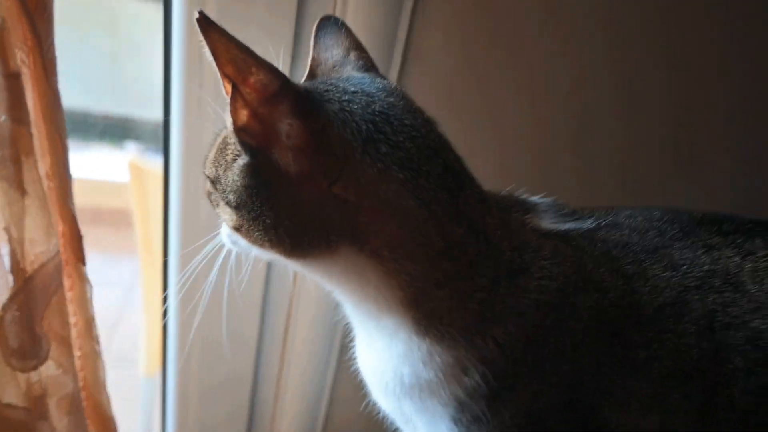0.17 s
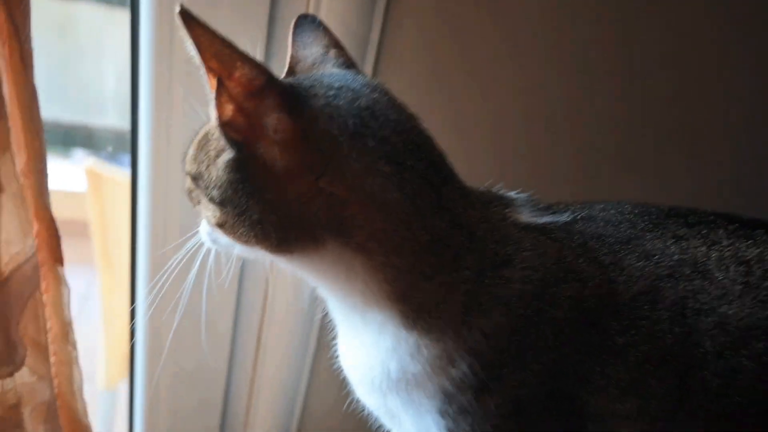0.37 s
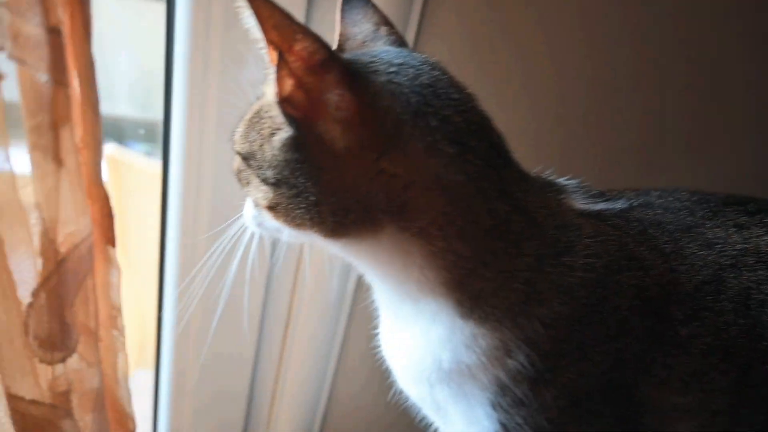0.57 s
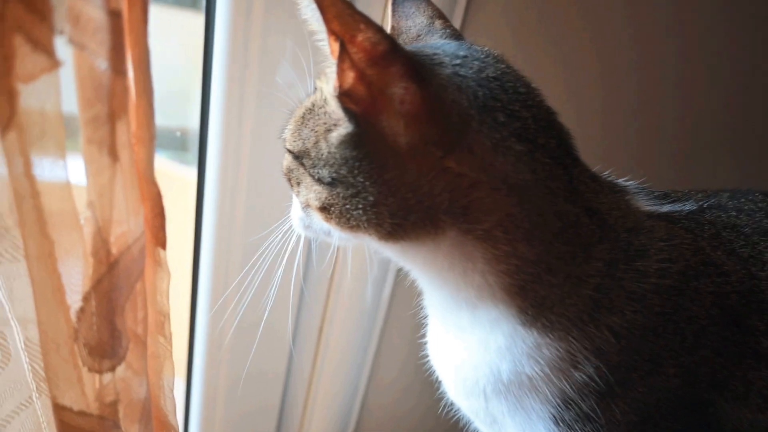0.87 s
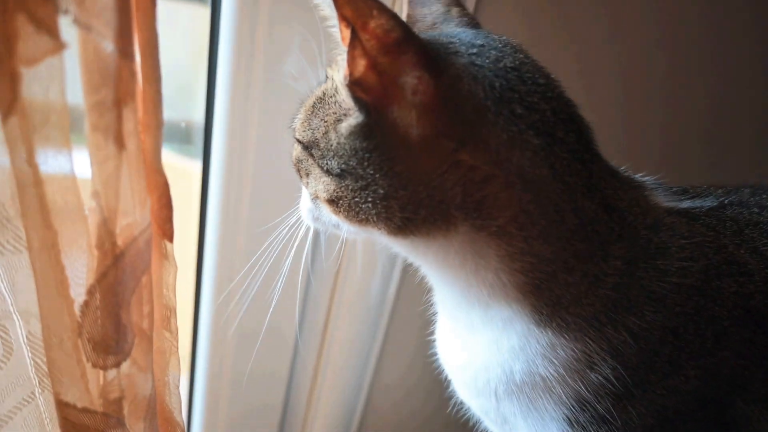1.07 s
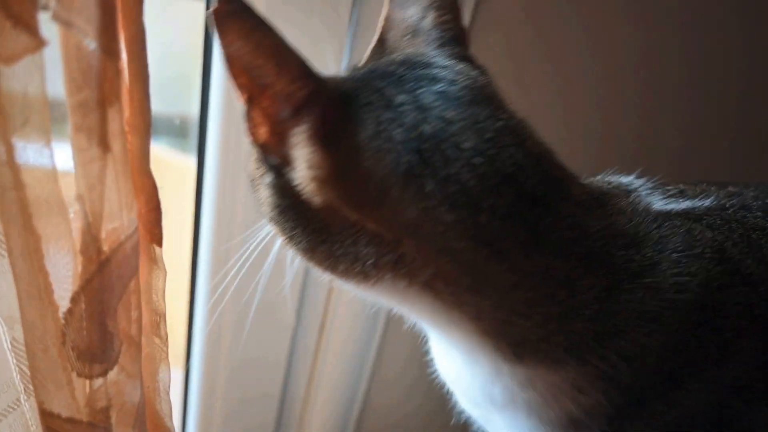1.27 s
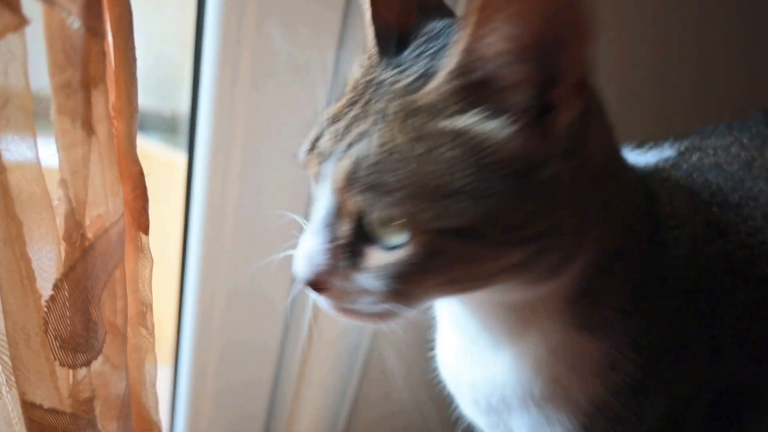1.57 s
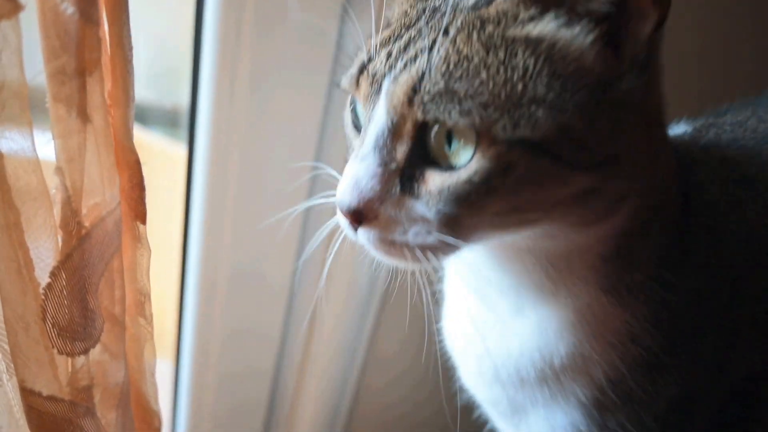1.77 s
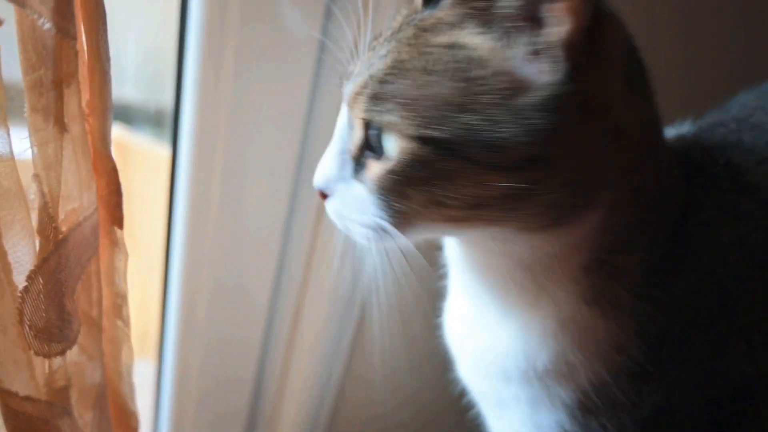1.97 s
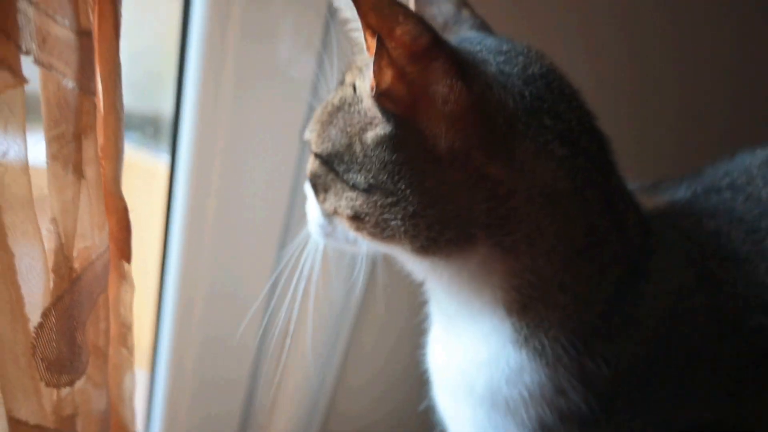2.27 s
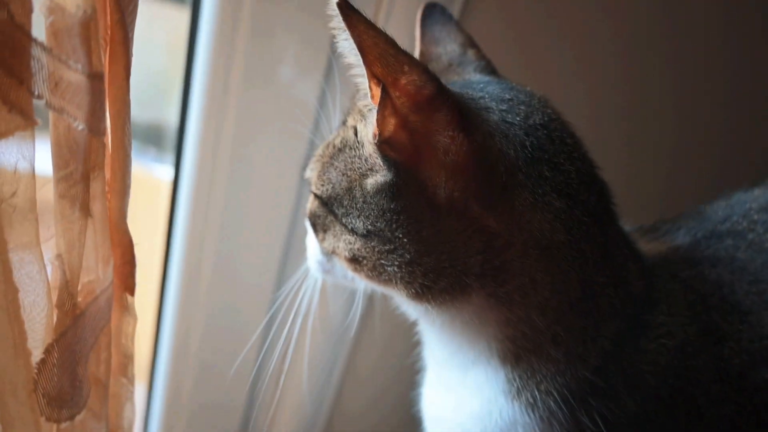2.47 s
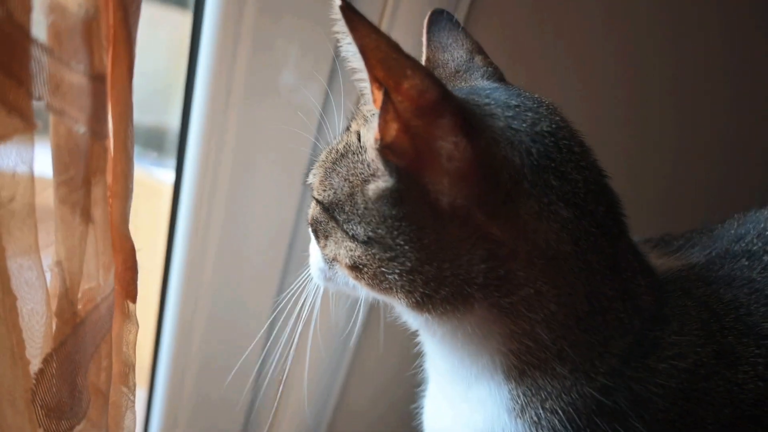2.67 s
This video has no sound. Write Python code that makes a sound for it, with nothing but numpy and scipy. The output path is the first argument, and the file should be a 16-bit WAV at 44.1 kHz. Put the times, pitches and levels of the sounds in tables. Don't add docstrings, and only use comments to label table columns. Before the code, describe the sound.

A cat gives one short, low, fluttering closed-mouth trill close by in a quiet humming room

```python
import sys
import numpy as np
from scipy import signal
from scipy.io import wavfile
from scipy.ndimage import uniform_filter1d

SR = 44100
rng = np.random.default_rng(int(sys.argv[2]) if len(sys.argv) > 2 else 0)


def gain_from_db(level_db):
    decades = np.asarray(level_db, float) / 20
    return 10 ** decades


def int16_out(signal):
    q = np.round(np.clip(np.atleast_2d(signal).T, -1, 1) * 32767)
    wavfile.write(sys.argv[1], SR, q.astype(np.int16))


N = 123921


def evened(x):
    return x / np.sqrt(np.mean(x ** 2) + 1e-20)


def read(points, hz):
    f, value = np.transpose(points)
    return np.interp(np.log(hz + 1), np.log(f + 1), value)


def bumps(centres, lengths, dbs):
    t = np.arange(N) / SR
    total = 0
    for centre, length, db in zip(centres, lengths, dbs):
        total = total + gain_from_db(db) * np.cos(np.pi * np.clip((t - centre) / length, -.5, .5))
    return total


def resonate(x, hz, width):
    turn = np.exp(2j * np.pi * hz * np.arange(len(x)) / SR)
    r = np.exp(-np.pi * width / SR)
    return 2 * (turn * signal.lfilter([1 - r], [1, -r], x / turn)).real


def resonate_twice(x, hz, width):
    return evened(resonate(resonate(x, hz, width), hz, width))


def noise(spectrum, patchy_db):
    frames, hz = N // 256 + 5, np.fft.rfftfreq(1024, 1 / SR)
    a, b, patches = rng.standard_normal((frames, 513, 3)).T
    patches = uniform_filter1d(patches, size=12, axis=0)
    patches = evened(uniform_filter1d(patches, size=14, axis=1))
    z = (a + 1j * b) * gain_from_db(read(spectrum, hz)[:, None] + patchy_db * patches)
    return evened(signal.istft(z, nperseg=1024, noverlap=768)[1][:N])


# pitch in Hz, level in dB per Hz.
AIR = [(53, -61), (90, -22), (140, -5), (177, -4), (223, -6.5), (540, -19.5), (618, -20.5), (668, -18),
       (9000, -39), (11700, -46), (19800, -120)]
# pitch in Hz, width in Hz, level in dB.
HUMS = [(226.6, 29, -61.5), (326.1, 17.5, -67.5), (72, 24, -63.5), (275, 39.5, -66.5)]


def room_tone():
    hums = sum(gain_from_db(db) * resonate_twice(rng.standard_normal(N), hz, width) for hz, width, db in HUMS)
    colour = [(30, 7.83)] + AIR + [(16000, AIR[-1][1] - 6)]
    return gain_from_db(-53) * noise(colour, patchy_db=1.21) + hums


# time in seconds, pitch in Hz, level in dB.
MOTOR = [(0, 136.2, -60.5), (.15, 137.7, -56.5), (.42, 138.1, -55), (.55, 137.8, -59.5), (.8, 140, -57),
         (.95, 139.5, -67.5), (1.2, 139.3, -59), (1.32, 137.4, -55), (1.6, 137.8, -53.5), (1.72, 138, -57),
         (1.93, 136.9, -51), (2.1, 137.5, -59), (2.27, 136.4, -63.5), (2.4, 138, -56), (2.8, 137, -53.5)]
# centre in seconds, length in seconds, pitch in Hz, level in dB.
DRONES = [(0.292, 0.2, 229, -56.5), (.5, 0.13, 207.5, -59), (.87, 0.23, 219, -53),
          (1.247, 0.07, 210.7, -53.5), (1.811, 0.13, 228.1, -52.5), (2.084, 0.19, 226, -56.5),
          (2.42, 0.26, 232, -60), (2.709, 0.079, 227.5, -55.5)]


def motor():
    t = np.arange(N) / SR
    s, hz, db = np.transpose(MOTOR)
    tone = gain_from_db(np.interp(t, s, db)) * np.sin(2 * np.pi * np.cumsum(np.interp(t, s, hz)) / SR)
    for centre, length, drone_hz, drone_db in DRONES:
        tone = tone + bumps([centre], [length], [drone_db]) * np.sin(2 * np.pi * drone_hz * t)
    return np.sqrt(2) * tone


# pitch in Hz, level in dB per Hz.
HISS = [(15, -33), (25, -28), (101, -11), (246, -8), (379, -4.5), (411, -4), (3270, -9), (15600, -7.5)]


def microphone_hiss():
    return gain_from_db(-60) * np.array([noise(HISS, patchy_db=1.0), noise(HISS, patchy_db=4.0)])


# start in seconds, length in seconds, level in dB.
RUBS = [(-.04, 0.17, -60.5), (0.074, 0.44, -61), (0.103, 0.051, -59), (0.24, 0.041, -72),
        (1.288, 0.085, -61), (1.409, 0.075, -60), (2.055, 0.12, -63.5), (2.7, 0.11, -69)]
# pitch in Hz, level in dB.
RUB = [(200, -1), (500, 5.5), (1500, 0.5), (3000, -9.5), (7000, -7.5), (12000, -17.5)]
# centre in seconds, length in seconds, level in dB.
SCUFFS = [(0.254, 0.043, -59), (0.268, 0.014, -63), (0.3, .012, -62), (.35, 0.047, -66),
          (1.775, 0.023, -66)]
# pitch in Hz, level in dB.
SCUFF = [(2500, -5), (5000, -14), (7000, 0), (9500, -12), (13000, -10)]
# time in seconds, level in dB.
GRIP = [(0.0, -46), (0.46, -50), (0.55, -50), (0.6, -50), (0.86, -53.5), (0.9, -56.5), (1.18, -55),
        (2.42, -59), (2.8, -75)]


def handling():
    t = np.arange(N) / SR
    start, length, level = np.transpose(RUBS)
    rub = bumps(start + length / 2, length, level) * noise(RUB, patchy_db=1.2)
    scuff = bumps(*np.transpose(SCUFFS)) * noise(SCUFF, patchy_db=1.2)
    slow, fast = rng.standard_normal((2, N))
    sway = resonate_twice(slow, hz=18, width=7)
    shudder = gain_from_db(-6) * evened(resonate(fast, hz=55, width=40))
    grip = gain_from_db(np.interp(t, *np.transpose(GRIP))) * (sway + shudder)
    thud_start_s, thud_length_s, thud_db = .11, .0175, -35
    u = (t - thud_start_s) / thud_length_s
    push = np.where((u > 0) & (u < 1), u, 0)
    return rub + scuff + grip + gain_from_db(thud_db) * uniform_filter1d(push, size=50)


def cracks(rows, shell=()):
    out, t = np.zeros(N + 4000), np.arange(4000) / SR
    crackles = rng.standard_normal((len(rows), 4000))
    crackles[:, 0] = 5
    shell_ring = sum(gain_from_db(db - 60 * t / t60) * np.sin(2 * np.pi * hz * t) for hz, t60, db in shell)
    for (s, db, hz, t60, top_hz), crackle in zip(rows, crackles):
        band = signal.butter(3, [hz / 2, top_hz], "band", fs=SR, output="sos")
        body = evened(signal.sosfilt(band, crackle)) + evened(resonate(crackle, hz, width=1400))
        fade = gain_from_db(-60 * t / max(t60, .003))
        out[round(s * SR):][:4000] += gain_from_db(db) * (body * fade / 3 + shell_ring)
    return out[:N]


# time in seconds, peak in dB, ring in Hz,
# seconds to fade by 60 dB, highest pitch in Hz.
TICKS = [(0.0195, -49.5, 3300, 0.018, 9000), (0.0378, -42.5, 6260, 0.011, 14000),
         (0.0425, -54, 900, 0.0086, 2000), (0.1137, -41.5, 6800, 0.008, 11800),
         (0.1142, -42.5, 2600, .008, 4000), (0.1213, -43.5, 5500, 0.019, 7900),
         (0.1228, -45, 2600, 0.0089, 3500), (0.1428, -49, 7100, 0.01, 12000),
         (0.143, -42.5, 2700, 0.0065, 3500), (1.3262, -51, 4800, 0.018, 12000),
         (1.3275, -50, 2030, .04, 2540), (1.3378, -47, 5800, 0.043, 9150),
         (1.340, -47.5, 1950, 0.061, 2560), (2.0782, -49.5, 2000, 0.028, 8000),
         (2.0872, -52.5, 5540, 0.015, 8000), (2.0885, -49.5, 1400, .03, 3200),
         (2.1285, -52, 3300, .015, 8000), (2.139, -48.5, 6140, 0.016, 7360),
         (2.142, -50, 2000, 0.033, 2500), (2.7162, -52.5, 5063, 0.019, 12000),
         (2.7185, -50, 2000, 0.02, 2570), (2.7565, -52, 5400, .008, 6300), (2.7567, -49, 2000, 0.013, 3000)]


def finger_ticks():
    return cracks(TICKS)


# time in seconds, peak in dB, ring in Hz,
# seconds to fade by 60 dB, highest pitch in Hz.
KNOCK = [
    (1.4066, -36, 5900, 0.02, 7800),
]
# pitch in Hz, seconds to fade by 60 dB, level in dB.
SHELL = [(2900, .055, -12), (2420, .05, -22), (4200, .05, -22), (7050, .045, -16), (1470, .08, -18)]
BOUNCES = [
    (1.4092, -41, 5500, .03, 7500),
    (1.4085, -40, 2900, .04, 3300),
    (1.416, -48, 4300, .03, 7500),
]


def finger_tap():
    return cracks(KNOCK, SHELL) + cracks(BOUNCES)


# centre in seconds, length in seconds, pitch in Hz, level in dB.
GULPS = [
    (1.58, 0.017, 152, -47),
    (1.63, 0.033, 177, -45),
    (1.629, .016, 345, -43),
]


def gulps():
    t = np.arange(N) / SR
    total = 0
    for centre, length, hz, db in GULPS:
        total = total + bumps([centre], [length], [db]) * np.cos(2 * np.pi * hz * (t - centre) + np.pi)
    return total


# centre in seconds, length in seconds, pitch in Hz, level in dB,
# extra level of the overtones in dB.
BEATS = [(1.5935, .014, 565, -41, -4), (1.609, .014, 535, -36.5, -3), (1.6255, .012, 525, -40, -1),
         (1.633, .010, 490, -40, -2), (1.644, .018, 400, -35.5, -5), (1.656, .018, 352, -37.5, -2),
         (1.667, .013, 475, -32, 1), (1.675, .008, 395, -42, 3), (1.681, .012, 435, -37.5, -1),
         (1.690, .016, 480, -33.5, 0), (1.699, .006, 350, -48, 0), (1.704, .009, 400, -35, -7),
         (1.711, .014, 350, -39.5, -2), (1.719, .012, 595, -35.5, 2), (1.7285, .011, 520, -33.5, -4),
         (1.736, .012, 366, -46, 4), (1.745, .015, 365, -39, -8), (1.7525, .011, 555, -34.5, -8),
         (1.761, .013, 595, -50, 14), (1.7705, .012, 505, -36.5, -10), (1.781, .014, 520, -44, -9),
         (1.792, .014, 470, -49, -9)]
# pitch in Hz, level in dB.
HEAD = [(600, -24), (760, -21), (940, -7), (1080, -11), (1190, -9), (1350, -16), (1900, -20), (2400, -36)]
# pitch in Hz, width in Hz, level in dB.
BREATH = [(750, 350, -11), (1150, 400, -4), (1880, 600, -2), (2700, 1000, -13), (3850, 900, -7),
          (7500, 5000, -18)]
# time in seconds, level in dB.
AIRFLOW = [(1.62, -70), (1.627, -38.5), (1.67, -36), (1.70, -35), (1.72, -40), (1.765, -38.5), (1.78, -71)]


def trill():
    centre, length, pitch, level, lift = np.transpose(BEATS)
    t = np.arange(N) / SR
    hz = uniform_filter1d(np.interp(t, centre, pitch), size=60)
    jitter = .018 * evened(uniform_filter1d(rng.standard_normal(N), size=80))
    turns = np.cumsum(hz * (1 + jitter)) / SR

    upper = sum(gain_from_db(read(HEAD, k * hz)) * np.cos(2 * np.pi * k * turns + k * k) for k in range(2, 7))
    shimmer_db = 1.8 * evened(uniform_filter1d(rng.standard_normal(N), size=110))
    upper = bumps(centre, length, level + lift) * upper * gain_from_db(shimmer_db)
    upper = upper + gain_from_db(3) * resonate(upper, hz=1185, width=70)
    voice = bumps(centre, length, level) * np.cos(2 * np.pi * turns) + upper

    leak, puff_turns = .2, .12
    puffs = (leak + np.exp(-(turns % 1) / puff_turns)) * rng.standard_normal(N)
    breath = 0
    for k, (f, width, db) in enumerate(BREATH):
        breath = breath + (-1) ** k * gain_from_db(db) * resonate_twice(puffs, f, width)
    airflow_db = np.interp(t, *np.transpose(AIRFLOW), left=-99, right=-99)
    return np.sqrt(2) * voice + gain_from_db(airflow_db - 16) * breath


# time in seconds, peak in dB, ring in Hz,
# seconds to fade by 60 dB, highest pitch in Hz.
SMACKS = [
    (1.6005, -47, 1180, .03, 1500),
    (1.6058, -47, 2530, 0.012, 12000),
    (1.6245, -46, 1900, 0.01, 5000),
    (1.7612, -38, 3700, 0.007, 9000),
    (1.778, -48, 9900, .035, 10500),
    (1.7825, -52, 5500, .015, 7000),
]


def mouth_clicks():
    return cracks(SMACKS)


# pitch in Hz, seconds to fade by 60 dB.
ROOM = [(300, 0.93), (600, 0.75), (1200, 0.38), (4000, 0.061)]


def room(x):
    taps = np.zeros((2, SR // 2))
    at = np.arange(200, SR // 2 - 20, 20)
    at = at + rng.integers(0, 20, (2, len(at)))
    np.put_along_axis(taps, at, rng.choice([-1., 1.], at.shape), 1)
    hz, t, z = signal.stft(taps, SR, nperseg=256)
    fade = gain_from_db(-60 * t / read(ROOM, hz)[:, None])
    tail = signal.istft(z * fade, SR, nperseg=256)[1]
    tail = tail / np.linalg.norm(tail[0])
    mid, side = signal.fftconvolve(x[None], tail, axes=1)[:, :N]
    side = gain_from_db(-36) * signal.lfilter(*signal.butter(1, 2500, "high", fs=SR), side)
    return np.array([mid + side, mid - side])


# pitch in Hz, seconds to fade by 60 dB, level in dB.
ROOM_MODES = [(607, .75, 8), (580, .75, 8), (528, .35, -2), (1190, .25, -6)]


def scene():
    near = finger_ticks() + finger_tap() + gulps() + trill() + mouth_clicks()
    modes = sum(gain_from_db(db) * resonate(near, hz, 2.3 / t60) for hz, t60, db in ROOM_MODES)
    return room_tone() + motor() + handling() + near + modes + gain_from_db(-26) * room(near)


def roll_off(x):
    return signal.sosfilt(signal.butter(12, 15710, fs=SR, output="sos"), x)


def record(dry):
    port = signal.butter(8, 15300, fs=SR, output="sos")
    mix = signal.sosfilt(port, dry) + microphone_hiss()
    return roll_off(mix)


dry = scene()
out = record(dry)
int16_out(out)
```